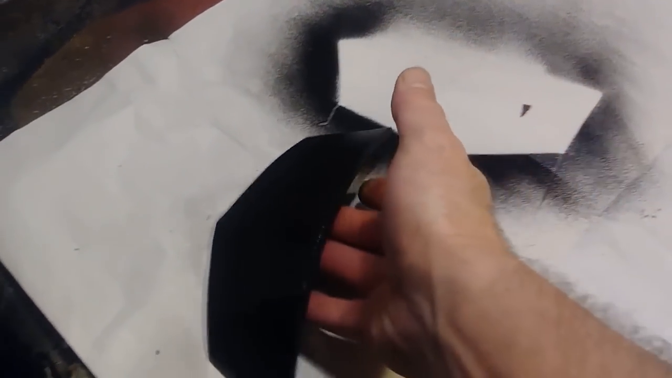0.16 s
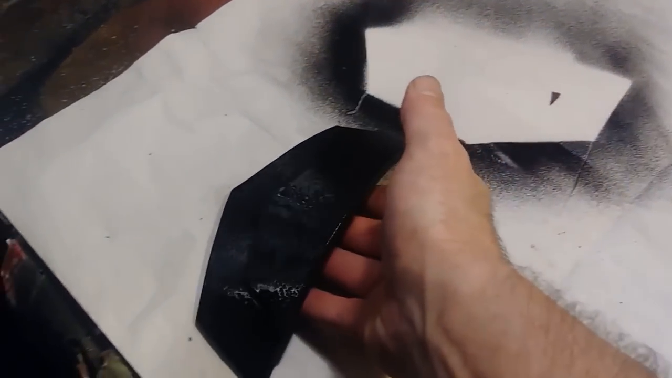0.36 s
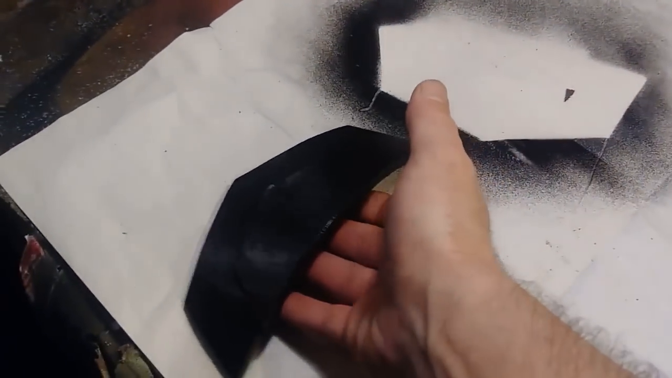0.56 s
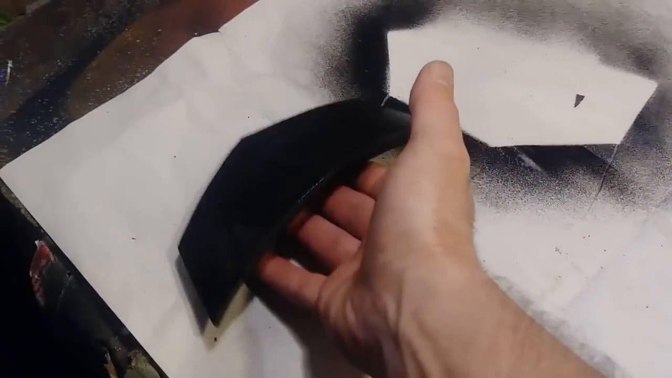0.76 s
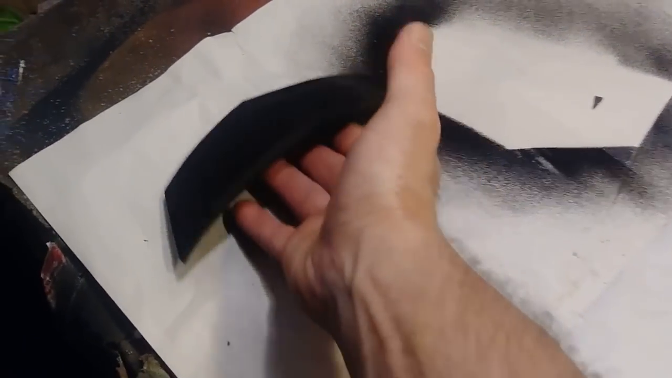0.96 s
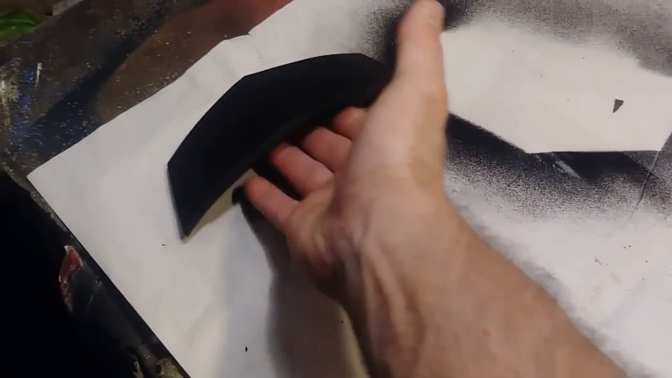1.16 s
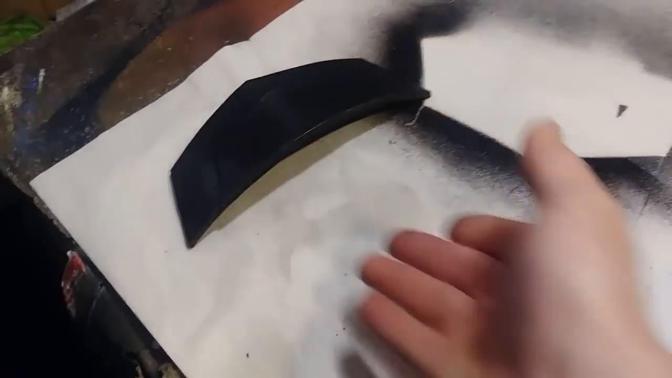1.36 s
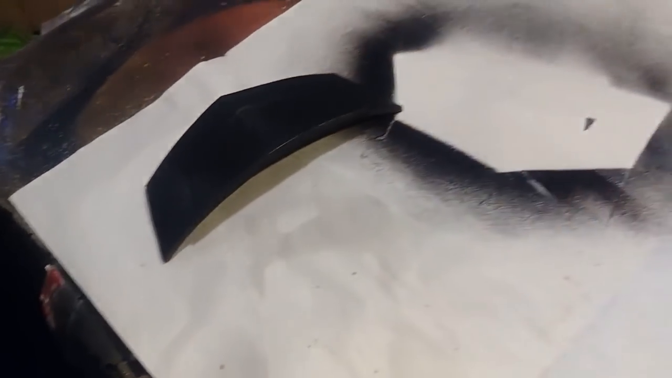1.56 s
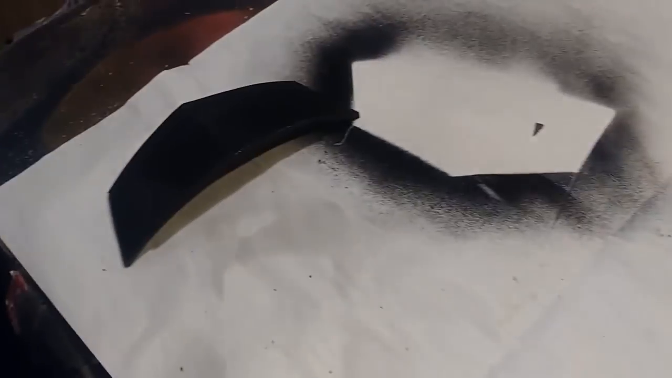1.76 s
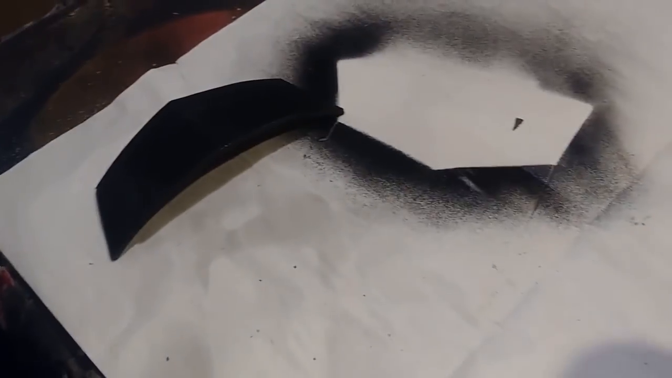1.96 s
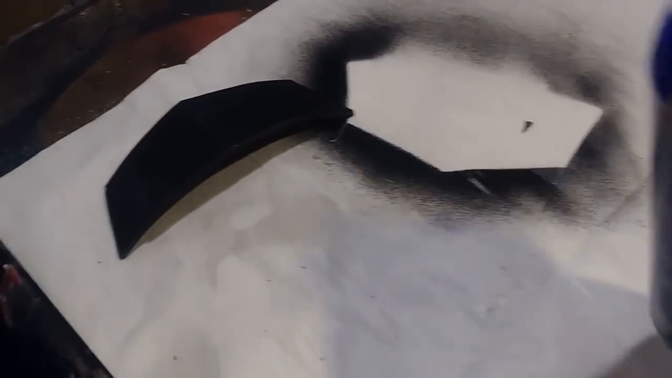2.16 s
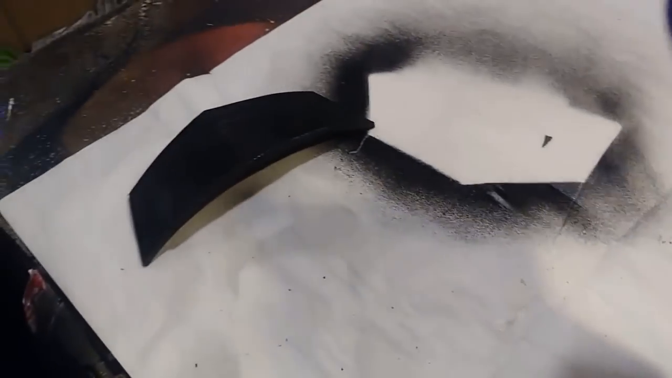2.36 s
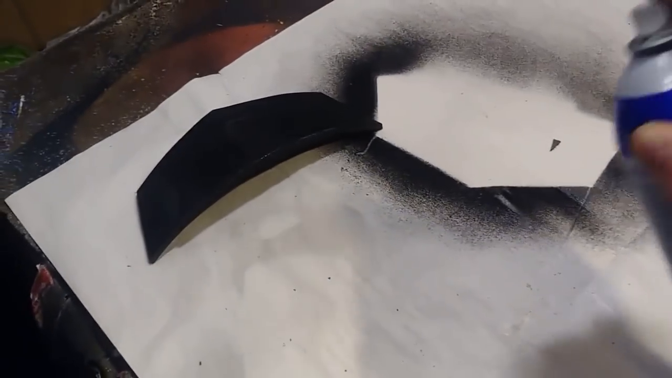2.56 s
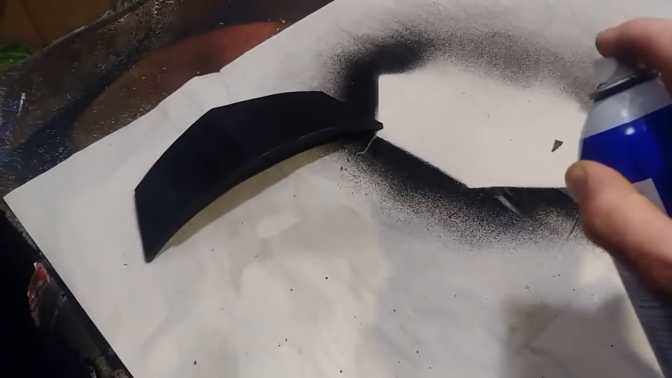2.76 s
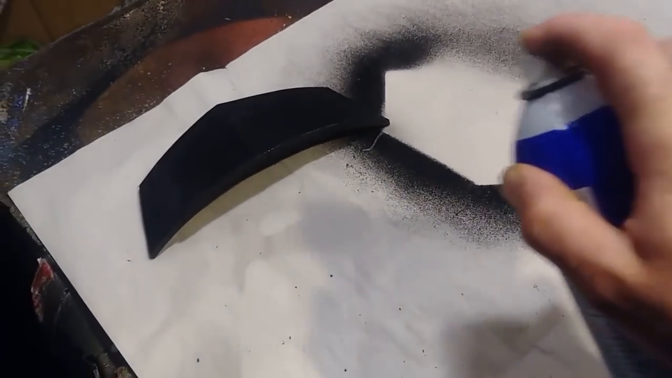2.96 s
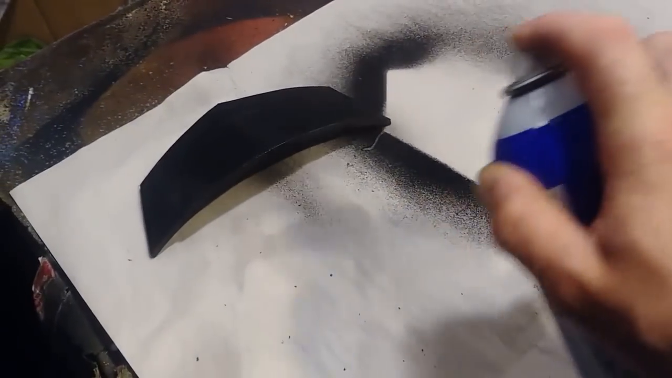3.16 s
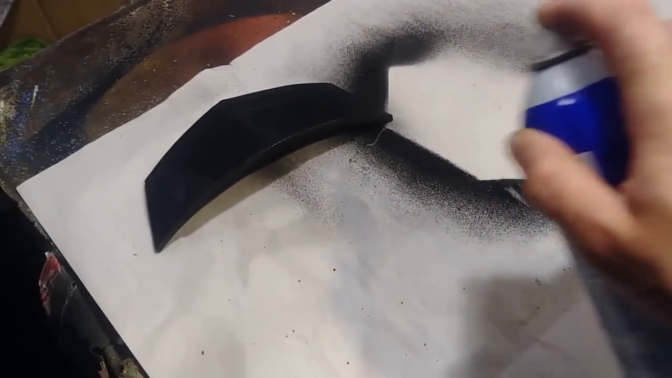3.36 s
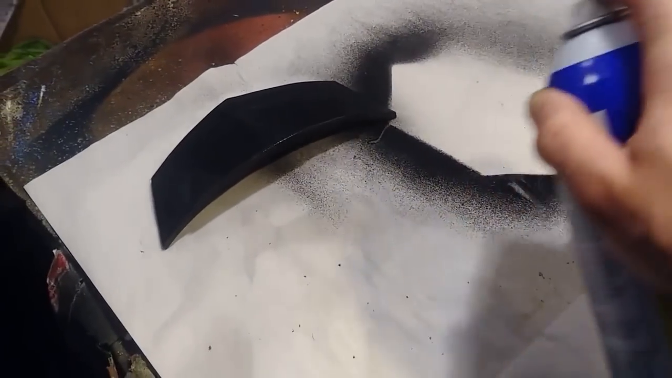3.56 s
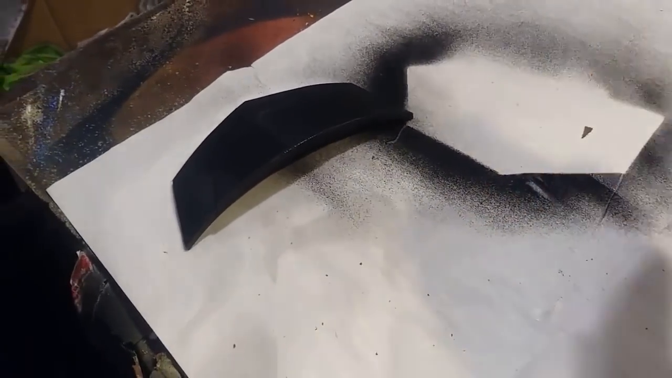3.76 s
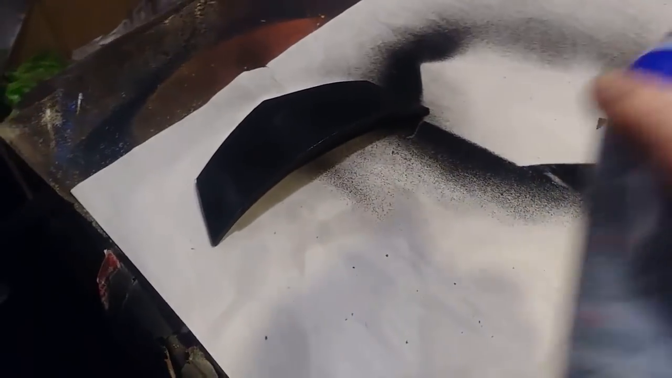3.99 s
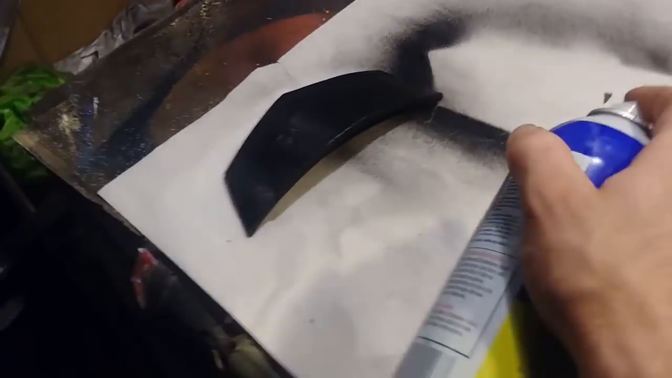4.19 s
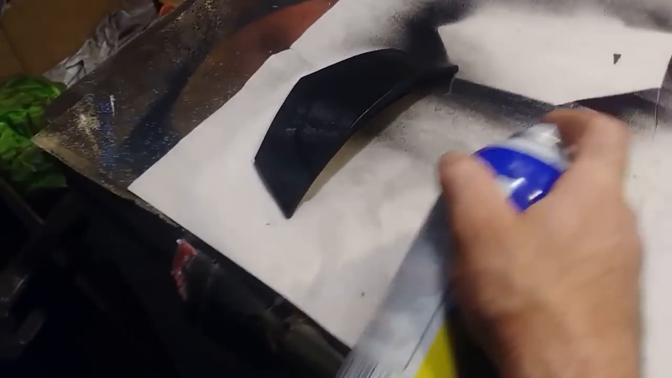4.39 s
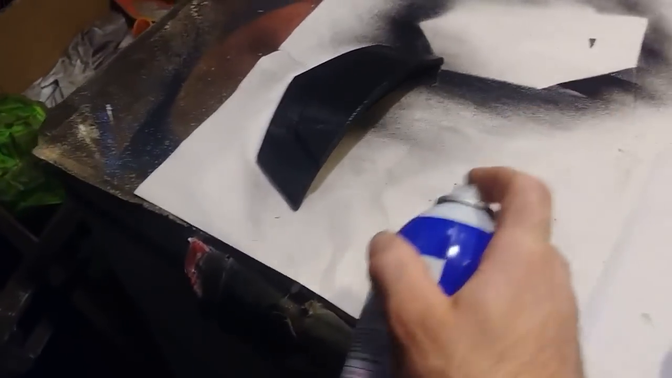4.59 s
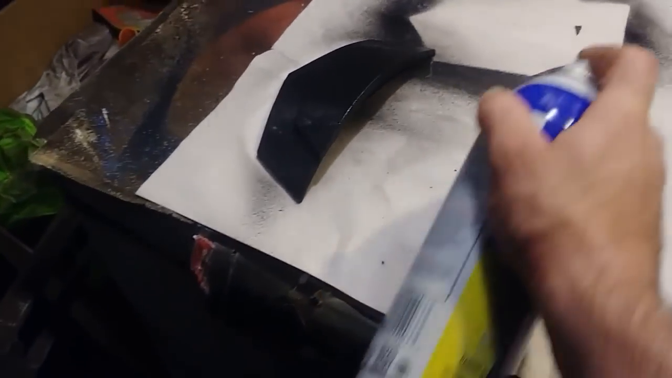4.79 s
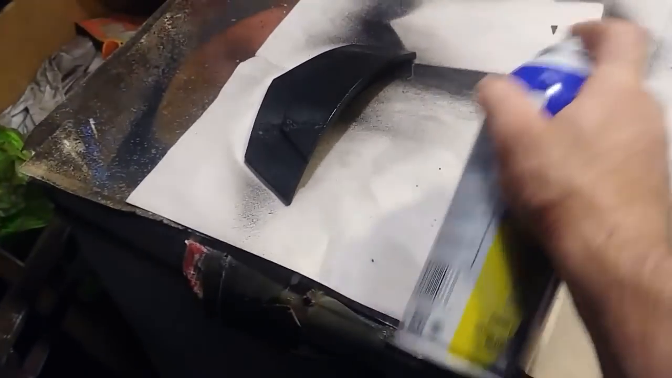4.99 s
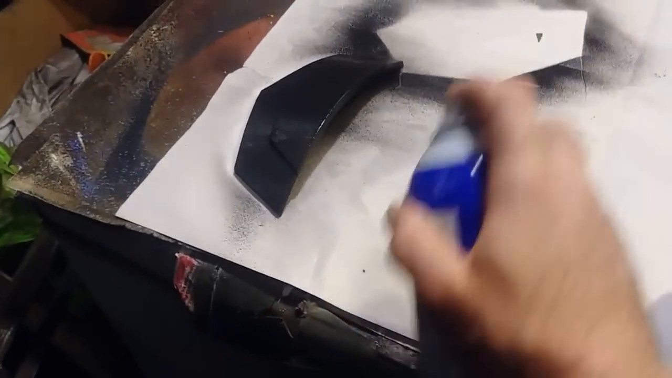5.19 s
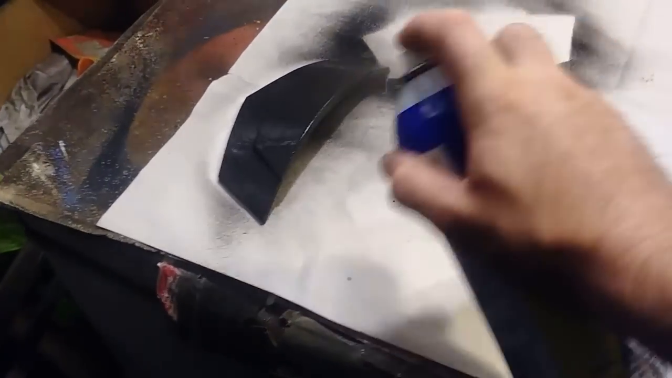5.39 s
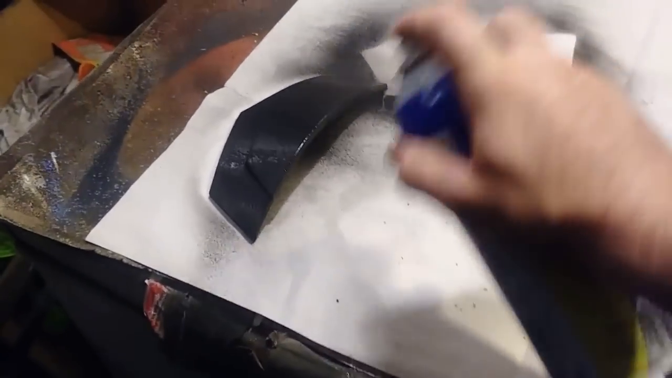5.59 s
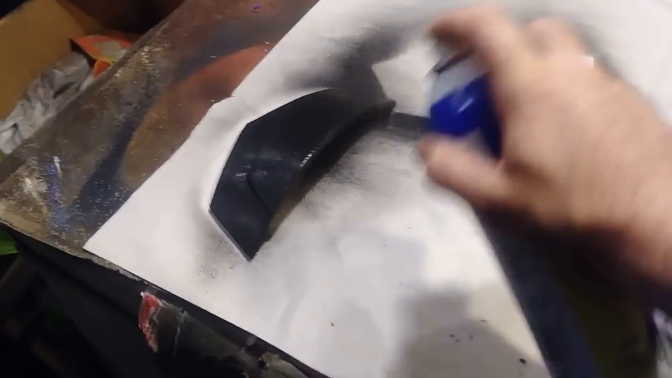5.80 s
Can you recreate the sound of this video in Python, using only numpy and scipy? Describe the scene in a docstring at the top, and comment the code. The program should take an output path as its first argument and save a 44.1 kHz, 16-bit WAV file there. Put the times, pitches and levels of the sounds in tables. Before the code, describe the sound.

In a small quiet room with faint mains hum, fingers rub a foam piece and slide it onto paper with dull taps. A can is lifted with small thumps and clicks. A bright spray burst lasts about a second, fades to a soft hiss, then a longer burst sweeps to and fro while the mixing ball knocks in the tin. One close microphone, centred.

```python
"""A spray can paints in two long bursts: grainy noise shaped by a valve, combed by echoes as the can sweeps.
Inside the tin the mixing ball knocks, each hit a filtered crack, a short clank and a ring of dying modes.
Before that, a dull low rush dies away while a hand slides a foam piece onto paper and picks up the can:
grainy friction noise and dull taps; a soft hiss lingers after the first burst.
A small quiet room adds a diffuse tail, still air and mains hum, heard by one close microphone."""
import sys
import numpy as np
from scipy import signal
from scipy.fft import rfft, irfft
from scipy.io import wavfile
from scipy.ndimage import uniform_filter1d, map_coordinates

SR = 44100
rng = np.random.default_rng(int(sys.argv[2]) if len(sys.argv) > 2 else 0)


def master_out(mix):
    """Clip the mix to full scale and print it as 16-bit PCM to the path in sys.argv[1]."""
    frames = np.transpose(np.atleast_2d(mix))
    ceiling = np.clip(frames, -1, 1)
    pcm = np.round(ceiling * 32767).astype(np.int16)
    wavfile.write(sys.argv[1], SR, pcm)


N = 257544
TIME = np.arange(N) / SR


def gain_of(db):
    """Decibels to an amplitude factor."""
    return 10 ** (np.asarray(db) / 20)


def evened(x):
    """Scales a signal to rms 1."""
    return x / np.sqrt(np.mean(x ** 2) + 1e-20)


def read(points, hz):
    """Reads a curve between its points on a log-frequency axis."""
    f, value = np.transpose(points)
    return np.interp(np.log(hz + 1), np.log(f + 1), value)


def add(mix, s, sound):
    """Mixes a sound in at a time in seconds."""
    part = mix[max(round(s * SR), 0):][:len(sound)]
    part += sound[:len(part)]


def coloured(x, colour):
    """Filters a signal by a spectrum curve, then scales it to rms 1."""
    gain = gain_of(read(colour, np.fft.rfftfreq(N, 1 / SR)))
    return evened(irfft(rfft(x) * gain, N))


def split(x, hz):
    """The parts below and above a frequency."""
    low = irfft(rfft(x) / (1 + (np.fft.rfftfreq(N, 1 / SR) / hz) ** 8), N)
    return low, x - low


def waver(hz):
    """Slow random movement of rms 1, up to about a rate."""
    slow = np.exp(-(np.fft.rfftfreq(N, 1 / SR) / hz) ** 2)
    return evened(irfft(rfft(rng.standard_normal(N)) * slow, N))


def grains(per_s, spread_db):
    """Sparse clicks of uneven size and random sign, rms 1."""
    size = gain_of(spread_db * np.minimum(rng.exponential(1, N), 4))
    present = rng.random(N) < per_s / SR
    return evened(size * rng.choice([-1, 1], N) * present)


def patchy(x, depth_db):
    """Lifts and sinks random patches, a few hundred hertz wide and some tens of milliseconds long."""
    z = signal.stft(x, nperseg=512)[2]
    field = rng.standard_normal(z.shape)
    for size in (4, 5):
        field = uniform_filter1d(field, size, axis=0)
        field = uniform_filter1d(field, 2 * size, axis=1)
    return signal.istft(z * gain_of(depth_db * evened(field)), nperseg=512)[1][:N]


def resonate(x, hz, width):
    """One resonance, with a gain of 1 at its centre."""
    return signal.lfilter(*signal.iirpeak(hz, hz / width, SR), x)


def whistle(age, flare_db):
    """Turbulence rings the nozzle's narrow bore: a flare as the valve opens settles under the hiss."""
    nozzle = (4450, 94)  # the fuzzy whistle: pitch_hz, width_hz
    flare_s, steady_db = 0.11, -23.5
    strength = gain_of(steady_db) + gain_of(flare_db) * np.exp(-(age / flare_s) ** 2)
    tone = resonate(rng.standard_normal(N), *nozzle)
    return strength * evened(resonate(tone, *nozzle))


def burst(opens, closes, opening_s, hiss_db, mist_db, fizz_db, flare_db, aim, colour, mist_colour):
    """One press: a turbulent jet laden with droplets, a nozzle whistle and a lower rush of mist on paper."""
    # hollow resonances of can and cap: pitch_hz, width_hz, level_db
    hollows = [(2188, 15, 1.5), (3480, 60, -25)]
    shut_db, close_db_per_s = -16.5, 818  # the valve's first leak; how fast the jet dies on release
    # dB of fizz gained per dB of jet, and lost per dB of mist as the nozzle faces the paper
    fizz_beam, fizz_shade = 1.8, .15
    s, hiss, mist = np.transpose(aim)
    beam = np.interp(TIME, s, hiss - hiss.mean())
    landing = np.interp(TIME, s, mist - mist.mean())

    age = np.maximum(TIME - opens, 0)
    opening = shut_db * np.maximum(1 - age / opening_s, 0)
    closing = close_db_per_s * np.maximum(TIME - closes, 0)
    valve = (TIME > opens) * gain_of(opening - closing)

    jet = rng.standard_normal(N) + gain_of(-9) * grains(per_s=2500, spread_db=3.5)
    jet = patchy(jet * gain_of(1.2 * waver(hz=68)), depth_db=1.4)
    jet += sum(gain_of(db) * resonate(jet, hz, width) for hz, width, db in hollows)
    body, fizz = split(coloured(jet, colour), hz=6730)
    fizz_level = gain_of(fizz_db + fizz_beam * beam - fizz_shade * landing)
    jet = gain_of(beam) * evened(body) + fizz_level * evened(fizz)
    rush = gain_of(landing) * coloured(patchy(rng.standard_normal(N), depth_db=1.5), mist_colour)

    spray_out = gain_of(hiss.mean() + hiss_db) * (jet + whistle(age, flare_db))
    return valve * (spray_out + gain_of(mist.mean() + mist_db) * rush)


def swept(x, drift_from_s):
    """Near surfaces echo the jet; the delays follow the swinging can, so comb notches glide."""
    # surfaces near the can: path_factor (on the sweep delay), echo_db
    surfaces = [(1, -9), (.87, -12), (1.07, -13)]
    swing_period_s, swing_far_at_s = .53, 4.76
    # the wrist swings to and fro while the can drifts away, which lengthens the echo path
    delay_s, swing_s, drift_s_per_s = .00255, 0.00026, 0.000307
    swing = np.cos(2 * np.pi * (TIME - swing_far_at_s) / swing_period_s)
    delay = delay_s + drift_s_per_s * (TIME - drift_from_s) + swing_s * swing
    echoes = sum(gain_of(db) * map_coordinates(x, [(TIME - path * delay) * SR], order=3)
                 for path, db in surfaces)
    return x + echoes


def spray():
    """Two presses of the valve, first upright and then tipped forward, combed by moving echoes."""
    # valve presses: opens_s, closes_s, opening_s, hiss_db and mist_db (added to the aim levels),
    # fizz_db (above about 6.7 kHz) and flare_db (opening whistle), both relative to the hiss
    presses = [(2.886, 3.778, 0.025, -1, 0, -12, -4), (4.288, 5.9, 0.031, -1, 8, -10, -16)]
    # aim of the can: time_s, jet_db, mist_db (landing on paper), before the trims of the press
    aim_upright = [(2.92, -34, -52.5), (3.03, -36, -46.5), (3.05, -37, -57), (3.062, -34.5, -45.5),
                   (3.14, -36.5, -52.5), (3.17, -32.5, -52.5), (3.624, -34, -52), (3.68, -33.5, -58),
                   (3.77, -34.5, -54)]
    aim_tipped = [(4.33, -35.5, -69), (4.362, -36.5, -59), (4.446, -35, -66), (4.502, -35.5, -64.5),
                  (4.774, -36.5, -52.5), (5.07, -35.5, -63), (5.262, -36.5, -57.5), (5.432, -37.5, -57),
                  (5.84, -35.5, -54.5)]
    # relative colour of the jet: freq_hz, density_db (per Hz)
    jet_upright = [(400, -29.5), (1100, -4.5), (1600, -0.5), (2150, 2), (2450, -1.5), (2800, 3.5),
                   (3700, 1), (4400, 3.5), (5100, -6), (6000, -13), (8000, -16), (10000, -23.5),
                   (12300, -26), (15500, -26)]
    jet_tipped = [(400, -42), (1100, -13), (1500, -4.5), (1900, 0), (2170, 2.5), (2700, -5.5), (3700, 2),
                  (4350, -0.5), (5100, -7), (6100, -11.5), (7900, -13.5), (10000, -20), (11800, -27),
                  (15500, -26)]
    # relative colour of the mist rushing onto the paper: freq_hz, density_db (per Hz)
    mist_upright = [(200, -22), (310, -33), (430, 1.5), (700, 7), (1100, 2), (1700, -1), (3500, -38)]
    mist_tipped = [(200, -23), (280, -18.5), (370, 1), (470, 7.5), (620, -1.5), (1150, 3.5), (1700, 1),
                   (3500, -13)]
    first = burst(*presses[0], aim_upright, jet_upright, mist_upright)
    second = burst(*presses[1], aim_tipped, jet_tipped, mist_tipped)
    return swept(first + second, drift_from_s=presses[0][0])


def causal(gain_db):
    """The minimum-phase click that has this spectrum, its energy as early as possible."""
    log_gain = np.log(gain_of(np.r_[gain_db, gain_db[-2:0:-1]]))
    return np.fft.ifft(np.exp(np.conj(signal.hilbert(log_gain)))).real


def blow(colour, hz, crack_db, focus_db, octaves):
    """One contact: a click lifted around its centre frequency, with more treble for a sharper crack."""
    f = np.fft.rfftfreq(2048, 1 / SR)
    focus = focus_db * np.exp(-(np.log2((f + 1) / hz) / octaves) ** 2)
    treble = (crack_db + 12.0) / (1 + (3800 / (f + 1)) ** 6)
    click = causal(read(colour, f) + focus + treble)
    return click / abs(click).max()


def scatter(t, t60, db):
    """A direct click followed by a dense, quickly dying rattle."""
    response = rng.standard_normal(len(t)) * gain_of(-60 * t / t60) * (1 - np.exp(-t * 1000))
    response *= gain_of(db) / np.linalg.norm(response)
    response[0] = 1
    return response


def ringing(t, modes, unit=1):
    """Dying sine modes; random shares and signs stand for where the blow lands."""
    shares = rng.uniform(.8, 1.2, len(modes)) * rng.choice([-1, 1], len(modes))
    return sum(share * gain_of(db - 60 * t / t60) * np.sin(2 * np.pi * f * unit * t)
               for share, (f, db, t60) in zip(shares, modes))


def knock(hz, crack_db, wall_db, tin_db):
    """A knock is a crack, a short clank of the struck wall and a longer ring of the whole tin."""
    # relative colour of the crack: freq_hz, density_db (per Hz)
    knock_colour = [(150, -16), (450, -9.5), (1100, 6), (2200, 10), (3600, 6.5), (5800, -2), (6800, -14.5),
                    (9000, -12), (15000, -54)]
    # clank of the struck wall: pitch_factor (on the wall pitch), level_db (relative), t60_s
    wall_modes = [(1, -2, 0.027), (.9, 4, 0.0038), (1.72, -10, 0.016)]
    # ring of the tin can: pitch_hz, level_db (relative), t60_s
    tin_modes = [(1772, -24.5, 0.015), (1938, 2, 0.068), (2064, -14.5, 0.36), (2237, -5, 0.26),
                 (2330, 3, 0.058), (2440, 6, 0.024), (2610, 1.5, 0.032), (3440, 1.5, 0.078),
                 (3350, -11.5, 0.04), (3600, -3, 0.18), (4425, -16.5, 0.066), (4820, -9, 0.089),
                 (5730, -28, 0.18)]
    t = np.arange(SR // 3) / SR
    spread = 1 - np.exp(-t / 0.00085)  # the blow takes a moment to spread over the wall
    click = blow(knock_colour, hz, crack_db, focus_db=1.5, octaves=0.54)
    crack = signal.fftconvolve(click, scatter(t, t60=0.039, db=0.5))[:len(t)]
    crack *= gain_of(-2 + 0.086 * crack_db)  # paint cushions the softer blows
    clank = gain_of(-9 + wall_db) * ringing(t, wall_modes, hz)
    ring = gain_of(-22 + tin_db) * ringing(t, tin_modes)
    return crack + spread * (clank + ring)


def can():
    """Hard blows of the ball crack and ring, cushioned ones clank; fingers click on the outside."""
    # the mixing ball hitting the can: start_s, level_db (relative), wall_pitch_hz,
    # hardness (0 for a cushioned blow to about 1 for bare metal)
    knocks = [(4.361, -19.5, 2160, .9), (4.604, -7, 2280, 0.64), (5.262, 2, 2395, 0.68),
              (5.336, -17, 1860, .1), (5.45, -8, 2040, 0.88), (5.465, -11, 1780, 0.15),
              (5.479, -9.5, 1920, 0.12), (5.544, 0, 2520, 0.61), (5.575, -17, 2070, 0.092),
              (5.631, -3, 1996, .2), (5.689, -9.5, 1810, 0.12), (5.716, -8, 1970, 0.069),
              (5.792, -2.5, 2230, 0.8), (5.821, -7.5, 1890, 0.045)]
    # fingers clicking on can and cap: start_s, level_db (relative), crack_db (sharpness)
    finger_clicks = [(2.3215, -25, -13), (2.337, -30, -31), (2.559, -21, -16), (2.595, -37, -22),
                     (3.9, -31, -3), (4.195, -34, -36)]
    out = np.zeros(N)
    for s, db, hz, hardness in knocks:
        # each share: dB when cushioned, plus dB gained at hardness 1
        crack_db, clank_db, ring_db = -18 + 10 * hardness, 7.5 - 12 * hardness, -11 + 13 * hardness
        add(out, s, gain_of(db) * knock(hz, crack_db, clank_db, ring_db))
    for s, db, crack_db in finger_clicks:
        add(out, s, gain_of(db) * knock(2184, crack_db, wall_db=7.5, tin_db=2.5))
    return out


def stroke(start, length, swell_db, attack_s, release_s):
    """A stroke's envelope: attack, a hold that swells or sags, release; ramps take their time per 20 dB."""
    held = np.clip((TIME - start) / length, 0, 1)
    before = np.maximum(start - TIME, 0) / attack_s
    after = np.maximum(TIME - start - length, 0) / release_s
    return gain_of(swell_db * (held - .5) - 20 * np.minimum(before + after, 10))


def friction(rows, colour, attack_s, release_s, top_db, body_db, grain_db, patch_db, hollow_db):
    """A grainy hiss with shifting colour, as of skin that catches and slips; each stroke sets its body."""
    slips = rng.standard_normal(N) + gain_of(grain_db) * grains(per_s=500, spread_db=-2.0)
    slips = patchy(slips * gain_of(2.0 * waver(hz=60)), patch_db)
    slips += gain_of(hollow_db) * resonate(slips, hz=2080, width=73)
    low, high = map(evened, split(coloured(slips, colour), hz=2184))
    out = np.zeros(N)
    for start, length, db, body, swell in rows:
        layers = gain_of(db + top_db) * high + gain_of(db + body + body_db) * low
        out += stroke(start, length, swell, attack_s, release_s) * layers
    return out


def low_rush():
    """A dull low rush at the start: soft noise dying away."""
    rush_row = (0, -57.5, 0.64)  # start_s, level_db, t60_s
    # relative colour: freq_hz, density_db (per Hz)
    rush_colour = [(120, -11), (250, -2), (400, 4), (700, -1.5), (1000, -16), (2500, -52)]
    s, db, t60 = rush_row
    decay = gain_of(db - 60 * np.clip((TIME - s) / t60, 0, 2))
    return (TIME >= s) * decay * coloured(rng.standard_normal(N), rush_colour)


def handling():
    """Friction noise as fingers rub, the piece slides and the hand strokes the can; then a lingering hiss."""
    # strokes before the trims below: start_s, length_s, level_db, body_db (relative), swell_db
    rubs = [(0.0, 0.14, -65.5, -11.5, -2.5), (.18, 0.063, -60, -9, -1), (.268, 0.059, -50.5, -12, 2),
            (.35, 0.022, -60.5, -4, 0), (.475, 0.03, -58.5, -13, 1), (.548, 0.061, -64, -11.5, -13),
            (.705, .03, -71, -41, -9), (.97, 0.087, -51.5, -29, 1), (1.236, .018, -59.5, -13.5, 1),
            (2.434, 0.0078, -59.5, -30, 12)]  # fingers on foam and paper
    slides = [(1.312, 0.05, -50.5, 0, 16), (1.378, 0.051, -43, 2, 3.5)]  # the piece sliding off the fingers onto the paper
    # strokes of the hand on the can; from 3.8 s a soft hiss lingers after the valve shuts:
    # the same columns, then hollow_db (a hollow note near 2 kHz)
    can_strokes = [(2.046, 0.0059, -47.5, -17.5, -14, -17), (2.091, 0.022, -54, -14, 9, -15),
                   (2.288, 0.025, -70, 2.5, -8, 20), (2.329, 0.039, -44.5, -20.5, -3, 14),
                   (2.489, .01, -68, -2, 2, 10), (2.556, 0.047, -49.5, -12.5, 6, 11.5),
                   (3.8, 0.11, -56, -10.5, -2, 3), (3.921, .21, -58, -10, -9, 3),
                   (4.189, 0.074, -64.5, -5.5, -4, 4)]
    # relative colours: freq_hz, density_db (per Hz)
    rub_colour = [(700, -26), (1200, -5), (1900, -13), (2800, -1.5), (3700, 0), (5000, -2.5), (8000, -19),
                  (12000, -44)]
    slide_colour = [(180, -83), (300, -59), (459, -8.5), (714, -30), (849, -4), (1400, 0), (2500, -6.5),
                    (4660, -15.5), (10100, -36.5), (13000, -69)]
    can_stroke_colour = [(150, -45), (250, -29), (466, -7), (642, 4.5), (710, -10), (962, 8), (1790, 3.5),
                         (2730, -4.5), (4530, -9.5), (7900, -38), (14000, -70)]
    out = friction(rubs, rub_colour, attack_s=0.039, release_s=0.022, top_db=-3.0, body_db=7.0,
                   grain_db=-4.5, patch_db=5.5, hollow_db=-40)
    out += friction(slides, slide_colour, attack_s=0.017, release_s=0.014, top_db=-2.0, body_db=-5,
                    grain_db=-4, patch_db=3.0, hollow_db=6)
    for *row, hollow_db in can_strokes:
        out += friction([row], can_stroke_colour, attack_s=0.012, release_s=0.045, top_db=-1.0, body_db=15,
                        grain_db=-9, patch_db=1.5, hollow_db=hollow_db)
    return out


def table():
    """Short dead taps on the papered table as the piece is set down and the can lifted."""
    # taps: start_s, level_db (relative), centre_hz, crack_db (sharpness)
    taps_on_paper = [(0.329, -52, 3870, -8), (0.362, -39.5, 3170, 0), (0.628, -45.5, 3000, -9),
                     (1.338, -29, 2120, -8), (1.375, -28.5, 1400, -13), (1.982, -42, 1200, -25),
                     (1.9875, -23, 1510, -15), (2.01, -32.5, 673, -13), (2.046, -31.5, 665, -10),
                     (2.112, -37, 720, -11), (2.201, -50, 1050, -45)]
    # relative colour: freq_hz, density_db (per Hz)
    tap_colour = [(150, -18), (400, -3), (650, 5), (1500, -0.5), (3000, 1.5), (5000, -2.5), (7000, -44),
                  (12000, -81)]
    out, t = np.zeros(N), np.arange(SR // 5) / SR
    for s, db, hz, crack_db in taps_on_paper:
        click = blow(tap_colour, hz, crack_db, focus_db=14.0, octaves=0.62)
        tap = signal.fftconvolve(click, scatter(t, t60=0.048, db=2.5))
        add(out, s, gain_of(db - 2) * tap)
    return out


def room(x):
    """A diffuse tail of noise, each band dying at its own speed."""
    # decay of the small room: freq_hz, t60_s
    room_decay = [(200, .35), (1000, .4), (3000, .38), (8000, .34), (15000, .26)]
    late = np.arange(SR // 2) > .006 * SR  # the tail starts after 6 ms
    hz, t, z = signal.stft(rng.standard_normal(SR // 2) * late, SR, nperseg=256)
    decay = gain_of(-60 * t / read(room_decay, hz)[:, None])
    tail = signal.istft(z * decay, SR, nperseg=256)[1]
    return signal.fftconvolve(x, tail / np.linalg.norm(tail))[:N]


def background():
    """Still air as shaped noise, and a mains hum of sines with slightly wavering phase."""
    # the quiet air: freq_hz, density_db (per Hz)
    air = [(25, -113), (45, -104), (62, -94), (85, -94), (150, -89), (180, -93), (230, -103), (300, -111),
           (450, -113), (700, -117), (2200, -119), (4000, -121), (6000, -127), (12000, -131), (15000, -139)]
    # the hum: pitch_hz, level_db (rms)
    hum_tones = [(120, -67.5), (146, -75)]
    hum = sum(gain_of(db) * evened(np.sin(2 * np.pi * hz * TIME + 0.16 * waver(hz=3)))
              for hz, db in hum_tones)
    density = gain_of(read(air, np.fft.rfftfreq(N, 1 / SR))) * np.sqrt(SR / 2)
    return hum + irfft(rfft(rng.standard_normal(N)) * density, N)


def scene():
    """Spray, knocks, low rush and handling in the room over the background, the same in both channels."""
    hiss, hits, soft = spray(), can() + table(), low_rush() + handling()
    wet = room(gain_of(-14) * hiss + gain_of(-13) * soft + gain_of(-10) * hits)
    near = split(hiss + soft + hits + wet, hz=178)[1]  # small sources radiate little bass
    return np.tile(near + background(), (2, 1))


def record(dry):
    """The recorder's band limit: a steep low-pass."""
    edge_hz = 15950
    lowpass = signal.firwin(511, edge_hz, window=("kaiser", 9), fs=SR)
    return signal.oaconvolve(dry, lowpass[None], "same")


dry = scene()
out = record(dry)
master_out(out)
```